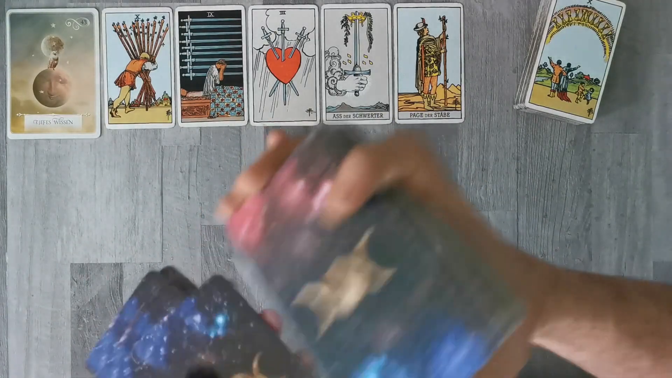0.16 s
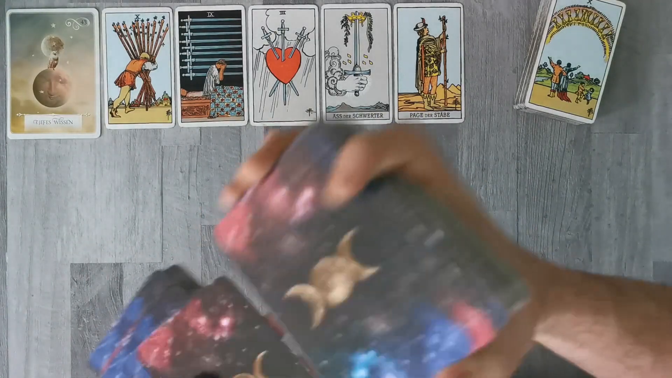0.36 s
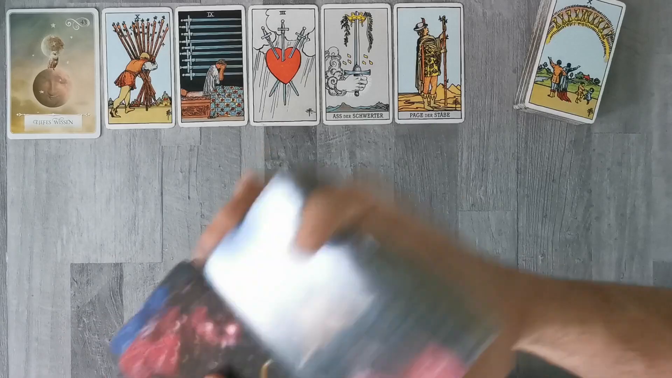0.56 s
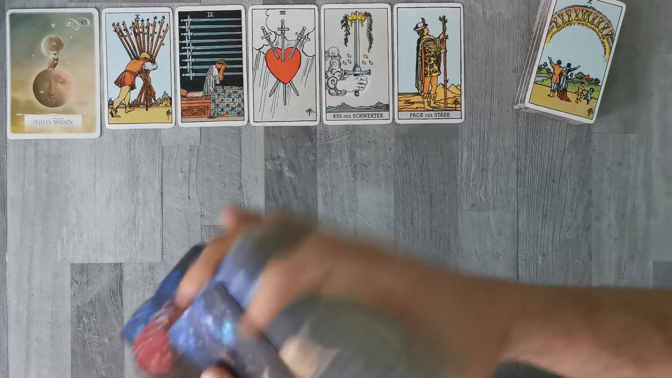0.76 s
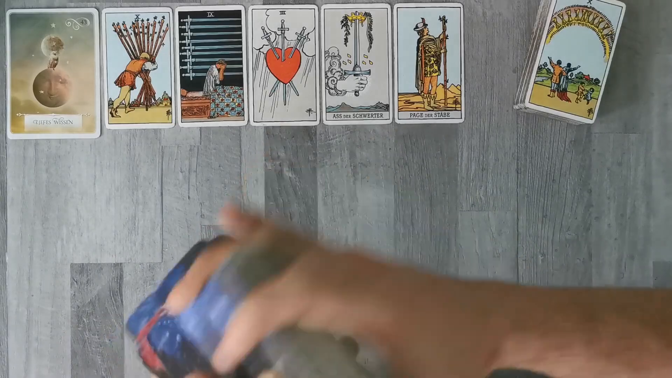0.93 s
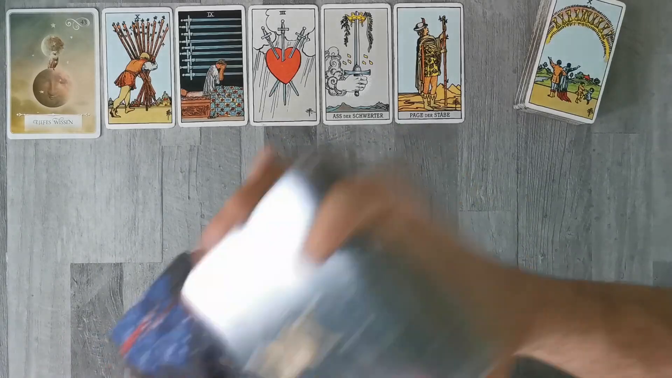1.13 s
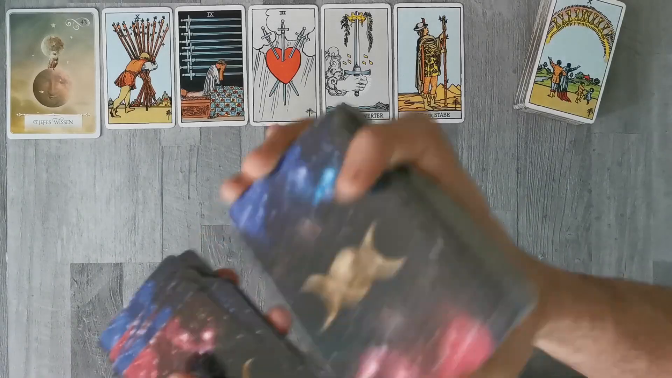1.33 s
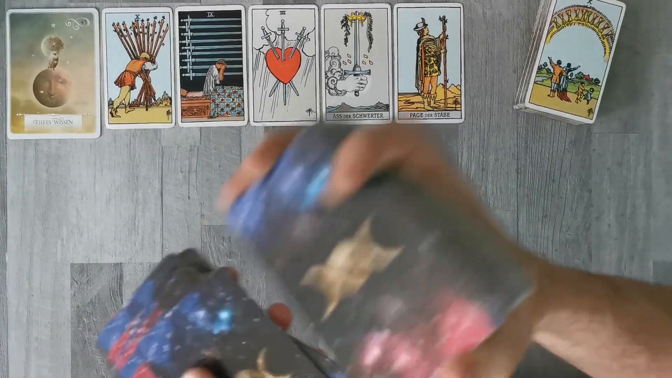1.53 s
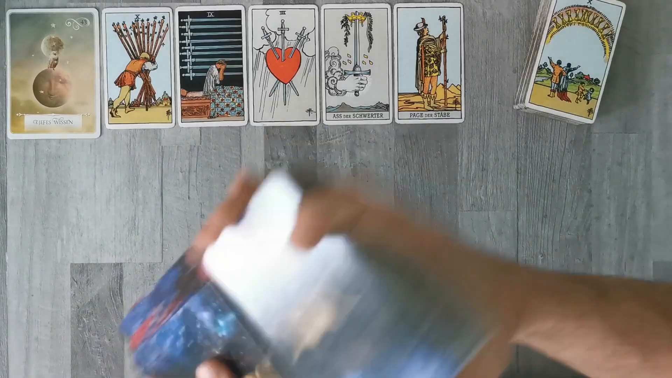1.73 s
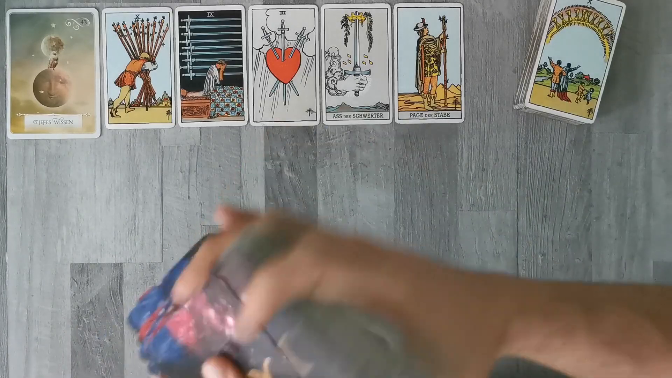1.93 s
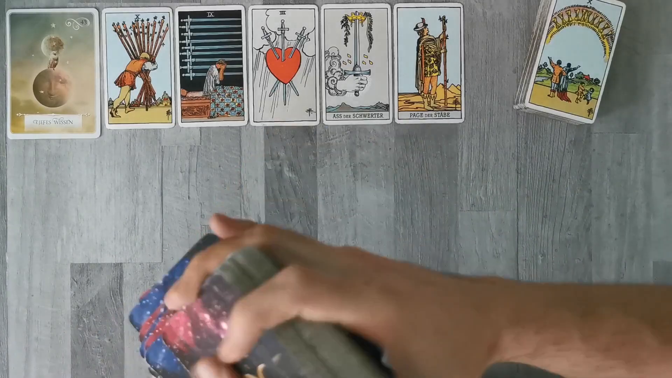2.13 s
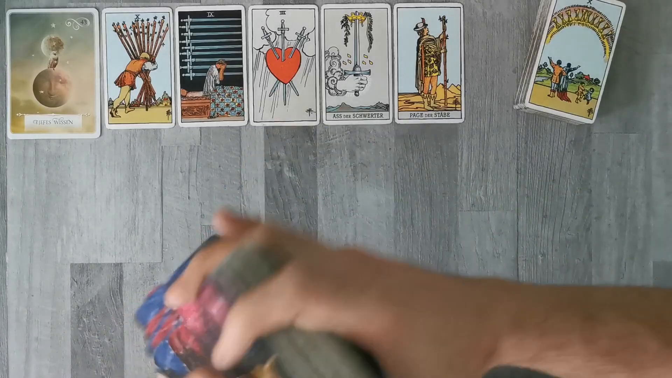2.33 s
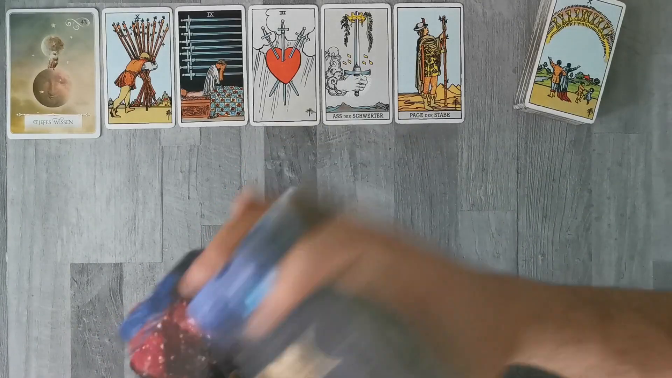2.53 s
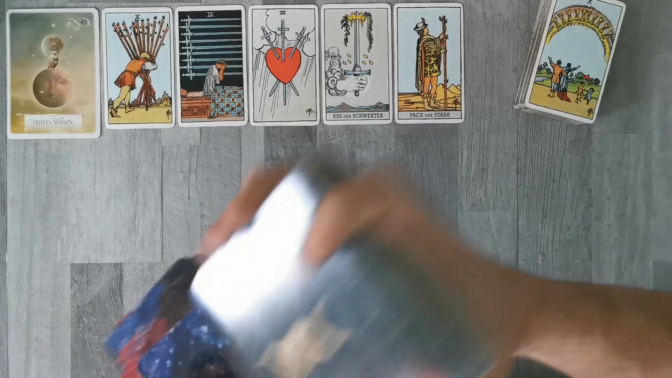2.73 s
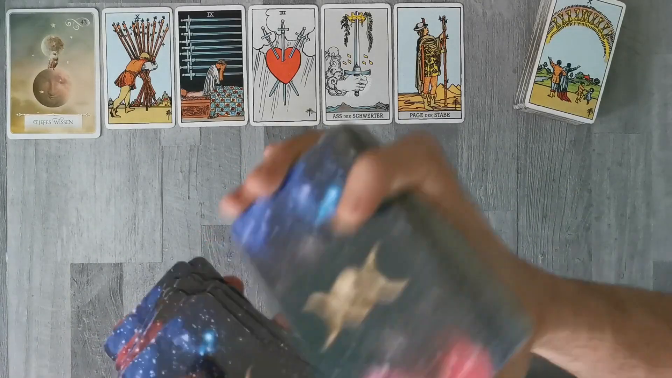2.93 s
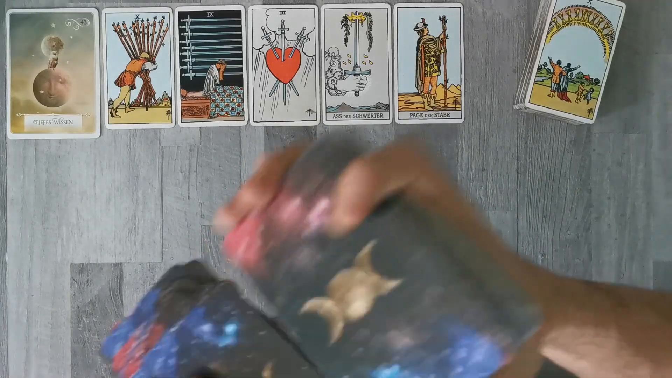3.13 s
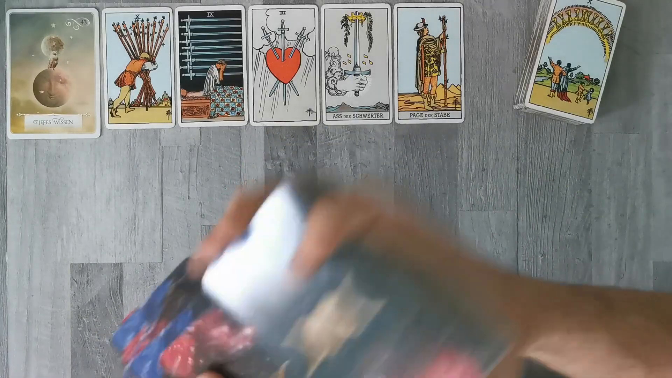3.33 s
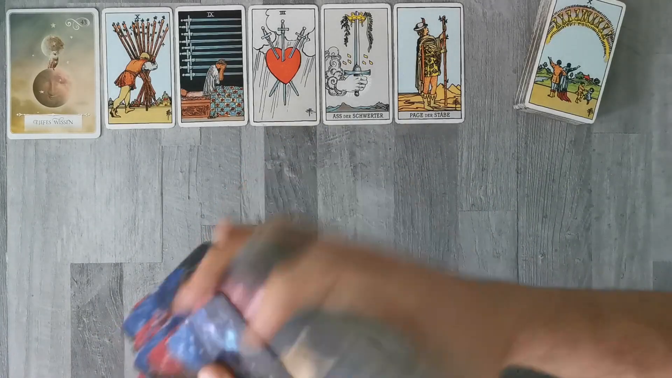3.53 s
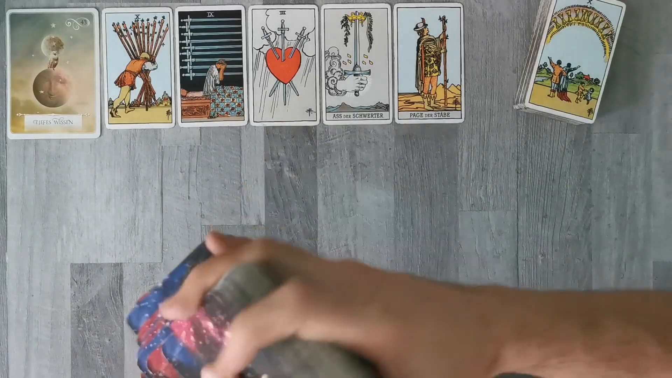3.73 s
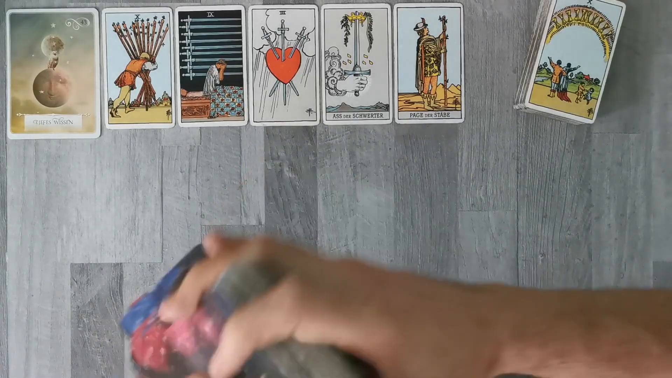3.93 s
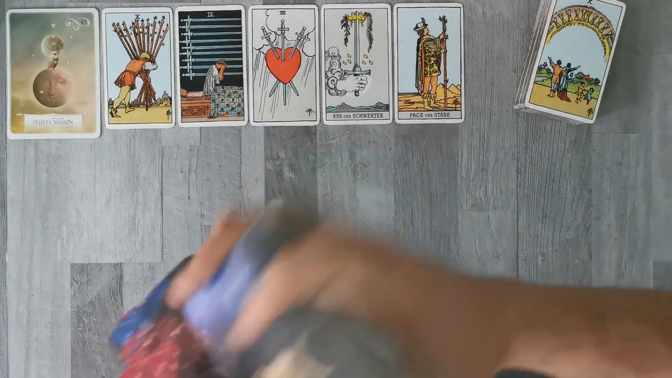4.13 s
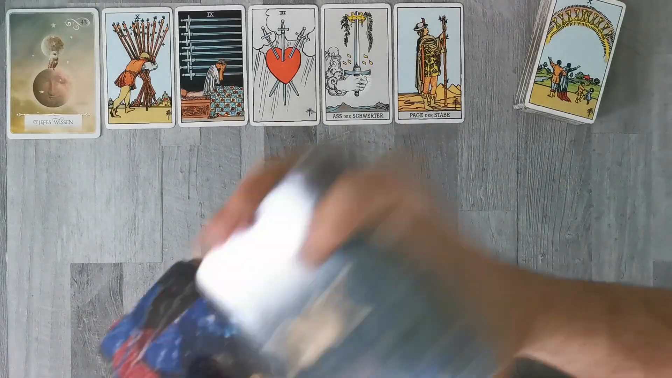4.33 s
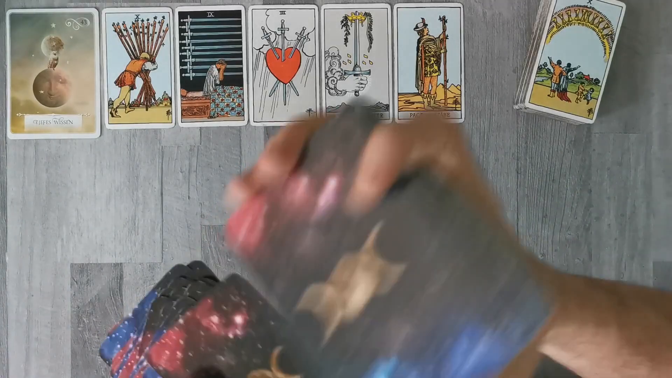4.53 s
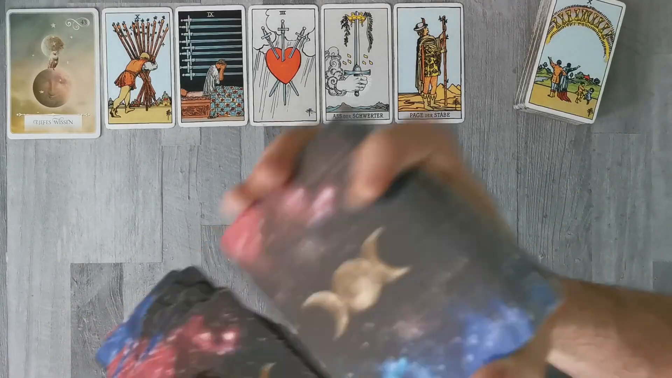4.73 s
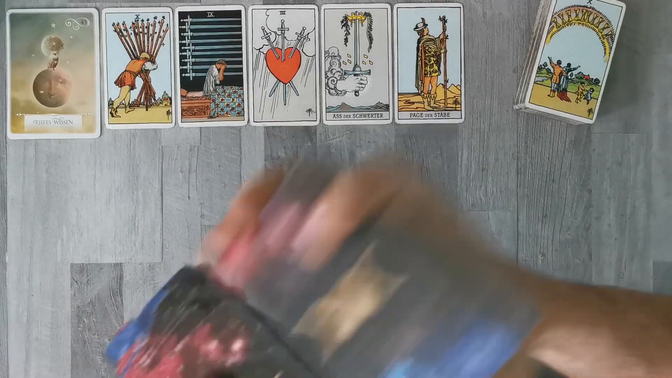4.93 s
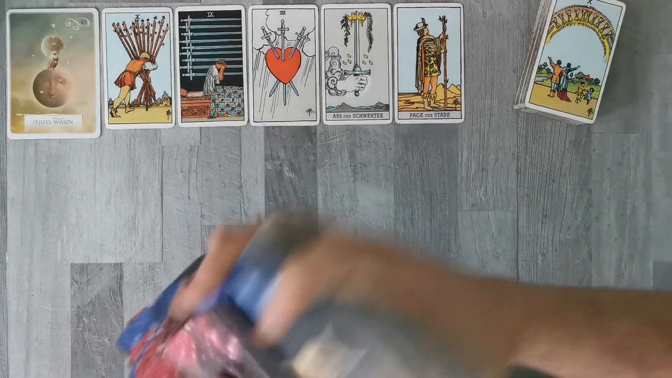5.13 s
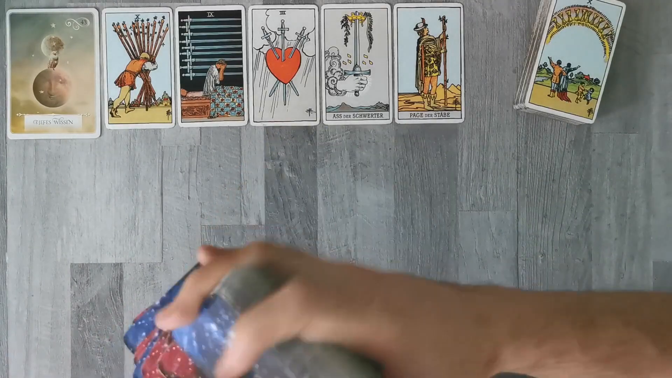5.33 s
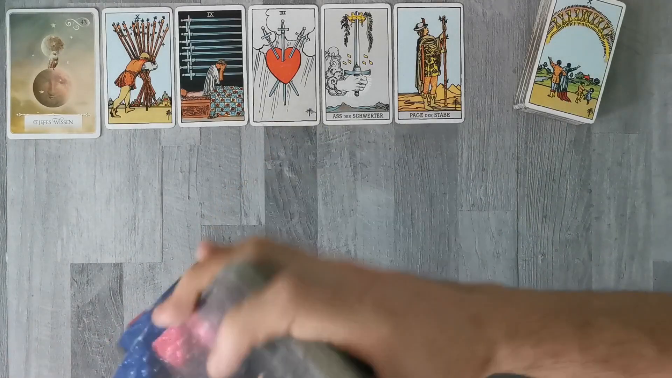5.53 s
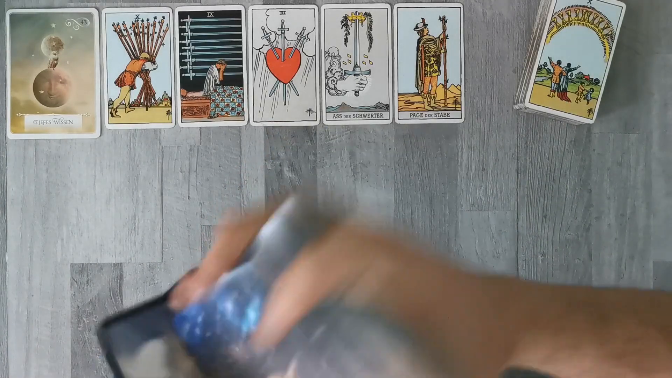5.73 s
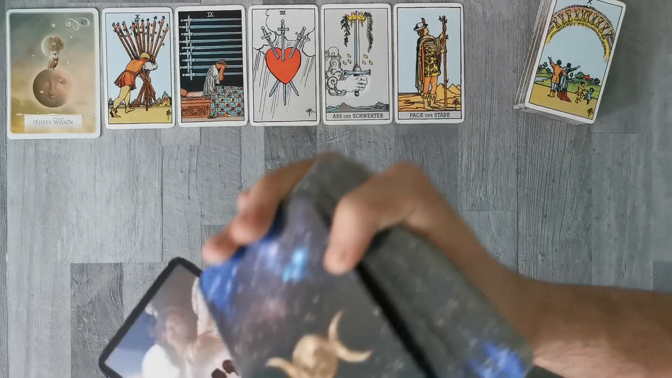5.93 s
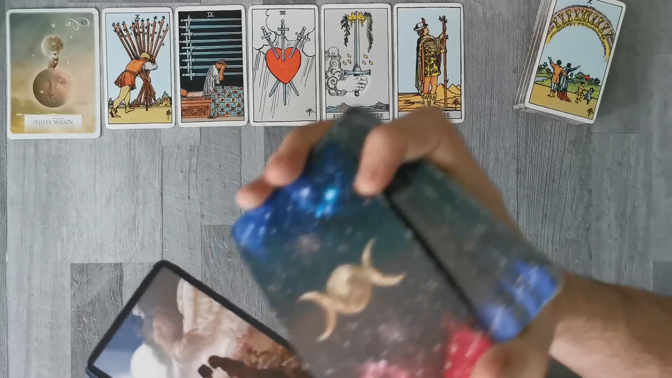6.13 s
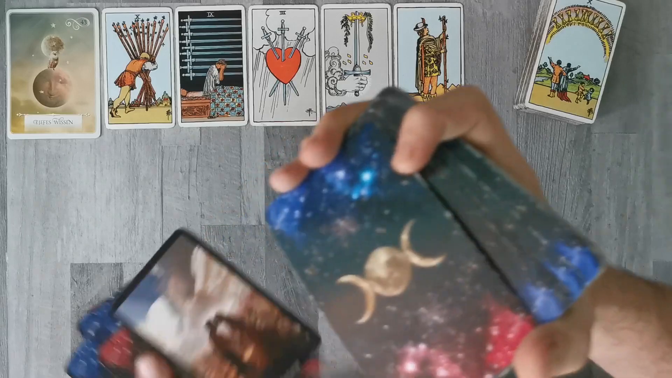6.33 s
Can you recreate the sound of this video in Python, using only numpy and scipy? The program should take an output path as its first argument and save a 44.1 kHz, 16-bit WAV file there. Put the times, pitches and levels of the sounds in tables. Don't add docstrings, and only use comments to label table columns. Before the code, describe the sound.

A steady card shuffle is already under way: dry slaps, brief sliding rustles, clicking card corners and dull low thumps from the hands, each slap slightly different. The rhythm stays even until about 5.5 seconds, then a squaring rustle, a firm tap and a double knock on the tabletop end it. Close stereo microphone, slightly left, quiet indoor room with low rumble and thin hiss.

```python
import sys
import numpy as np
from scipy import signal
from scipy.fft import rfft, irfft, next_fast_len
from scipy.io import wavfile

SR = 44100
rng = np.random.default_rng(int(sys.argv[2]) if len(sys.argv) > 2 else 0)


def to_linear_factor(level_db):
    exponent = np.asarray(level_db, float) / 20
    return 10 ** exponent


def dump(signal):
    limited = np.clip(np.atleast_2d(signal).T, -1, 1)
    pcm = np.round(limited * 32767).astype(np.int16)
    wavfile.write(sys.argv[1], SR, pcm)


N = 280917
SIZE = next_fast_len(N + 4096)
HZ = np.maximum(np.fft.rfftfreq(SIZE, 1 / SR), 1)
TIME = np.arange(N) / SR

# (time [s], hiss rms [dB], face rub [dB rel], rise [ms], contact [ms])
LANDINGS = [(0.226, -24, -8, 9, 18.6), (0.47, -29, -1, 12.4, 14), (0.691, -27.5, 0.5, 6.8, 16.4),
            (0.923, -26.5, -2.5, 11.3, 14.6), (1.17, -24.5, -8.5, 6.4, 17.6), (1.398, -21.5, -3.5, 14, 9.6),
            (1.64, -28, -5.5, 9.7, 7.2), (1.872, -27.5, -4, 7.9, 9.7), (2.107, -27, -7.5, 9.5, 14),
            (2.32, -24, -14.5, 4.3, 16), (2.561, -28, -4.5, 3.5, 11), (2.794, -26.5, -3.5, 9.5, 13.4),
            (3.005, -28, 2.5, 13, 6.4), (3.231, -26.5, -15.5, 0.71, 11), (3.457, -24, -6.5, 4.2, 13.4),
            (3.694, -20.5, -17.5, 3.5, 11.2), (3.926, -24, -9, 8, 12), (4.1406, -25, -4.5, 6.3, 17.5),
            (4.378, -22.5, -18, 9, 11.4), (4.599, -25.5, -10.5, 6.9, 10), (4.827, -23, -9.5, 7, 18.5),
            (5.05, -21.5, -7.5, 6.3, 5.9), (5.281, -22.5, -10.5, 4.6, 15.6), (5.5186, -28, -12, 7.7, 13.4)]
# (edge sheen [dB rel], finest hiss [dB rel], slide home [dB rel])
LANDING_COLOURS = [(-7.5, 0.5, 4), (-1.5, 2, -9), (-3, -1, -6), (-2.5, 0.1, -5), (0, -1, 2), (-9, 3, -14),
                   (4, 2.3, -1.5), (1, -1, 9.5), (0.5, 4, 10), (-3.5, -1.2, 3.5), (-0.5, 1, 8.5),
                   (-1, 2.5, -4), (-1.5, 2.5, 0), (1, -2, 6), (-7, -0.5, 1.5), (0, 2.5, 0.5), (-7, 4.5, 0),
                   (-3.5, -1.5, 5), (-4, -2.5, -2), (-3.5, -2.5, 4.5), (-7, 0, 3.5), (-8, 1, -4),
                   (-11, -1.5, -2), (1.5, -2, 6), (-20, -1.7, 0.1), (-7, 0, 0.1), (-10.5, -5.5, 0.1)]
# (time [s], hiss peak [dB], air [dB rel], body [dB rel], mid [dB rel], contact [ms])
TABLE_DROP = [
    (5.876, -32.5, -11.5, 5, 9, 2.4),
    (5.8848, -20, -9, -9, 3.5, 2.4),
    (5.899, -16.5, -12, -14.5, 4.5, 0.79),
]
SPLIT_HZ = (1200, 4000, 9500)


def rms_one(x):
    return x / np.sqrt(np.mean(x ** 2) + 1e-20)


def at_hz(points, hz):
    p = np.array(points, float)
    return np.interp(np.log(hz), np.log(np.maximum(p[:, 0], 1)), p[:, 1])


def through(x, response):
    return irfft(rfft(x, SIZE) * response, SIZE)[..., :N]


def band(x, low_hz, high_hz):
    return signal.sosfilt(signal.butter(2, [low_hz, high_hz], "band", fs=SR, output="sos"), x)


def resonate(x, hz, width_hz):
    r = np.exp(-np.pi * width_hz / SR)
    poles = [1, -2 * r * np.cos(2 * np.pi * hz / SR), r * r]
    return signal.lfilter(np.array([1, 0, -1]) * (1 - r * r) / 2, poles, x)


def strikes(rows):
    clicks, rows = np.full(N, 1e-18), np.array(rows)
    clicks[(rows[:, 0] * SR).astype(int)] = to_linear_factor(rows[:, 1])
    return clicks


def ring(clicks, modes):
    out = 0
    for hz, db, t60 in modes:
        r, w = to_linear_factor(-60 / (t60 * SR)), 2 * np.pi * hz / SR
        out = out + to_linear_factor(db) * signal.lfilter([0, np.sin(w)], [1, -2 * r * np.cos(w), r * r], clicks)
    return out


def diffuse(mid_side):
    # (frequency [Hz], likeness [0-1])
    likeness = [(30, 0.8), (100, 0.85), (300, 0.9), (1000, 0), (3000, 0), (8000, 0.9), (15000, 0.2)]
    alike = np.clip(at_hz(likeness, HZ), 0, .99)
    mid, side = through(mid_side, np.sqrt([(1 + alike) / 2, (1 - alike) / 2]))
    return np.array([mid + side, mid - side])


def quiet_room():
    # (frequency [Hz], density [dB per Hz])
    floor_colour = [(12, -43), (20, -3.5), (52, -10), (66, -16.5), (76, -18), (123, -9), (153, -19.5),
                    (197, -10), (220, -35), (407, -23), (481, -21), (888, -28), (15700, -51)]
    # (frequency [Hz], width [Hz], rms [dB])
    hum_lines = [(44, 5.3, -61), (119.7, 10, -59.5), (193.3, 9.2, -61), (288, 29, -64.5)]
    floor = to_linear_factor(-53.5) * rms_one(through(rng.standard_normal((2, N)), to_linear_factor(at_hz(floor_colour, HZ))))
    white = rng.standard_normal((2, N))
    hum = sum(to_linear_factor(db) * rms_one(resonate(resonate(white, hz, w), hz, w)) for hz, w, db in hum_lines)
    hiss = to_linear_factor(-77.0) * white + to_linear_factor(-75) * band(white, 11200, 18000)
    return diffuse(floor + hum + hiss)


def room(x, level_db, gap_s):
    # (frequency [Hz], decay by 60 dB [s])
    decay = [(100, 0.017), (400, 0.3), (1000, 0.24), (2200, 0.35), (3300, 0.24), (6000, 0.31), (9000, 0.24),
             (15000, 0.2)]
    white, tail, step = rng.standard_normal((2, 2, N)), 0, np.sqrt(2)
    fill = np.exp(-1 / (gap_s * SR))
    for k, low in enumerate(70 * step ** np.arange(16)):
        keep = to_linear_factor(-120 / (at_hz(decay, low * step ** .5) * SR))
        poles = np.convolve([1, -keep], [1, -fill])
        energy = signal.lfilter([(1 - keep) * (1 - fill)], poles, band(x, low, low * step) ** 2)
        tail = tail + np.sqrt(np.maximum(energy, 0)) * rms_one(band(white[k % 2], low, low * step))
    tail = tail + to_linear_factor(1.0) * resonate(tail, 596, 70)
    return to_linear_factor(level_db) * diffuse(tail)


def table_echoes(x, level_db, fade_ms):
    ms = np.arange(1, SR // 20) / SR * 1000
    echoes = rng.standard_normal((2, len(ms))) ** 3 * np.exp(-ms / fade_ms) * (ms > .8)
    echoes /= np.sqrt(np.sum(echoes ** 2, axis=1, keepdims=True))
    return to_linear_factor(level_db) * through(x, rfft(echoes, SIZE))


def arm_thuds():
    # (time [s], peak [dB])
    soft_blows = [(0.009, -32), (0.152, -39.5), (0.257, -31.5), (0.385, -41.5), (0.502, -33.5),
                  (0.625, -43), (0.703, -28), (0.859, -38.5), (0.966, -40), (1.088, -31.5), (1.207, -35),
                  (1.344, -39), (1.416, -32), (1.561, -38), (1.649, -34.5), (1.772, -27), (1.88, -33.5),
                  (2.026, -42), (2.141, -39.5), (2.353, -32), (2.482, -36), (2.71, -37.5), (2.814, -38),
                  (2.951, -31), (3.022, -28.5), (3.266, -43), (3.387, -40.5), (3.466, -31), (3.492, -29.5),
                  (3.618, -42), (3.728, -32), (3.937, -32.5), (4.15, -24.5), (4.173, -40), (4.3, -40),
                  (4.376, -42), (4.62, -39), (4.843, -35.5), (5.078, -27), (5.295, -31), (5.529, -29),
                  (5.695, -39.5), (5.765, -30), (5.879, -24), (5.916, -38)]
    # (frequency [Hz], level [dB], decay by 60 dB [s])
    low_modes = [(86, -13, 0.035), (137, 2.5, 0.044), (173, -8.5, 0.01)]
    return band(ring(strikes(soft_blows), low_modes), 72, 170)


def fingertips():
    # (time [s], peak [dB])
    taps = [
        (1.7735, -20),
        (1.781, -21),
        (1.7, -23),
        (3.4985, -14),
        (2.7247, -17),
        (2.713, -28.5),
        (5.809, 0.5),
    ]
    # (time [s], peak [dB])
    palm_pats = [(0.156, -37.5), (0.259, -34.5), (0.388, -35), (0.628, -46), (0.704, -34), (0.86, -38.5),
                 (1.089, -35), (1.419, -33), (1.774, -33.5), (2.028, -48), (2.142, -52), (2.485, -41),
                 (2.715, -45.5), (3.393, -40), (4.155, -40.5), (4.307, -43.5), (5.009, -44), (5.061, -33),
                 (5.286, -35), (5.882, -25.5)]
    # (frequency [Hz], level [dB], decay by 60 dB [s])
    palm_modes = [(280, 0, 0.075), (345, -7, 0.027)]
    flicks = to_linear_factor(13.5) * band(strikes(taps), 120, 2700)
    return flicks + to_linear_factor(0.5) * band(ring(strikes(palm_pats), palm_modes), 150, 600)


def table_knock():
    # (frequency [Hz], level [dB], decay by 60 dB [s])
    top_modes = [(1310, -5, 0.015), (1660, 2, 0.04), (1793, -9.5, 0.17), (2350, -23.5, 0.1)]
    return to_linear_factor(6.5) * ring(strikes(TABLE_DROP[1:]), top_modes)


def pings():
    # (time [s], peak [dB], pitch [Hz])
    corners = [(0.167, -32, 2630), (0.6393, -28, 2460), (0.7048, -23, 2430), (0.9133, -31.5, 2530),
               (0.9301, -18, 1100), (1.134, -25, 2690), (1.1907, -21, 2720), (1.2112, -25, 1440),
               (1.3394, -19, 2220), (1.3549, -15, 1690), (1.4097, -25.5, 2380), (1.9055, -17, 2960),
               (2.147, -29, 1550), (2.3376, -26, 2170), (2.576, -23, 2360), (2.7228, -20.5, 2440),
               (2.8125, -18.5, 2140), (2.9506, -20, 2230), (2.9564, -26, 2100), (3.0014, -22, 1240),
               (3.0142, -24, 2470), (3.2382, -32, 1100), (3.465, -16, 2300), (3.4983, -22.5, 1420),
               (3.8657, -20, 1650), (3.8896, -22, 1250), (3.9382, -19, 2230), (4.145, -23, 1240),
               (4.1588, -19, 1190), (4.3791, -28.5, 1150), (4.6064, -20, 2060), (4.8272, -28, 2010),
               (4.8447, -15, 2550), (5.0641, -21, 2320), (5.2917, -23, 1130), (5.3223, -26, 2500),
               (5.5238, -23, 1140), (5.695, -26, 1420), (5.7912, -30, 2200), (5.8854, -7, 1147),
               (5.8981, -7, 1660), (6.0095, -30.5, 2220)]
    cycles, partner_ratio = 31, .58
    out, t = np.zeros(N), np.arange(SR // 20) / SR
    for s, db, hz in corners:
        partner_hz = hz * partner_ratio if hz > 1900 else hz / partner_ratio
        modes = np.array([[hz], [partner_hz]])
        rung = np.sin(2 * np.pi * modes * t) * to_linear_factor(-60 * t * hz / cycles) * to_linear_factor([[0], [-6.5]])
        at = int((s + .0007) * SR)
        out[at:at + len(t)] += to_linear_factor(db - 3) * rung.sum(axis=0)
    return out


def grit(spread_db, lump_db, lump_hz):
    lumps = np.clip(rms_one(band(rng.standard_normal(N), lump_hz / 6, lump_hz)), -2, 2)
    size = to_linear_factor(spread_db * np.minimum(rng.exponential(1, N), 3) + lump_db * lumps)
    return rms_one(size * rng.standard_normal(N))


def catches(per_s, level_db):
    size = to_linear_factor(level_db + 2.98 * np.minimum(rng.exponential(1, N), 2.5))
    return size * (rng.random(N) < per_s / SR) * rng.choice([-1, 1], N)


def stroke(s, rise_ms, hold_ms, fade_ms, slide_db=-19, slide_ms=14, arch_db=4):
    part = slice(max(int((s - .1) * SR), 0), int((s + .2) * SR))
    ms = (TIME[part] - s) * 1000
    before = np.minimum(ms, 0)
    rise = np.maximum(np.exp(before / rise_ms), to_linear_factor(slide_db) * np.exp(before / slide_ms))
    arch = to_linear_factor(1.5 - arch_db * np.clip(2 * ms / hold_ms - 1, -1, 1) ** 2)
    return part, rise * arch * np.exp(-np.maximum(ms - hold_ms, 0) / fade_ms)


def gliding():
    # (time [s], level [dB])
    rubbing = [(0.0, -29), (0.14, -64), (1.2, -52.5), (1.55, -57), (1.78, -52), (2.0, -69), (2.65, -55.5),
               (3.05, -74), (3.4, -51.5), (4.2, -60), (4.4, -52), (4.9, -91), (5.68, -50), (5.775, -34),
               (5.86, -51), (6.04, -40), (6.08, -87), (6.2, -82)]
    s, db = np.transpose(rubbing)
    busy, slide = to_linear_factor(np.interp(TIME, s, db)), np.zeros(N)
    for (s, db, *_), (*_, home_db) in zip(LANDINGS, LANDING_COLOURS):
        part, shape = stroke(s + 0.035, 30, 5.3, fade_ms=13)
        slide[part] += to_linear_factor(db - 7.5 + home_db) * shape
    return to_linear_factor([[-8], [-9], [-7], [-13.5]]) * (busy + slide * to_linear_factor([[-15.5], [1], [0], [0.3]]))


def lifts():
    # (time [s], hiss peak [dB], body [dB rel], face [dB rel])
    pickups = [(0.1594, -37.5, -14, -15), (0.169, -39.5, -26, 2.5), (0.389, -35, -4.5, -6),
               (0.6382, -33.5, -6, -4), (0.859, -55, 4, -17), (0.897, -40, -18, -32),
               (1.092, -39, 1.5, -0.5), (1.133, -29.5, -9, -7.5), (1.338, -24, -23, -2),
               (1.575, -39, -16, -12.5), (1.7696, -59, 24, -8), (1.8372, -35, -5.5, -8),
               (2.031, -44, -43, -12), (2.261, -49, -2, 5), (2.4873, -45, 2, -11), (2.7272, -35, -15, 7.5),
               (2.955, -36.5, -15, -2), (3.39, -46, 3, -9), (3.641, -41, 0, -8.5), (3.666, -31, -19, -46),
               (3.865, -46.5, 7, 10.5), (3.8877, -40.5, 2, 9), (4.0982, -45, 8, -5.5),
               (4.305, -46.5, 2.5, -2), (4.984, -52.5, 8, 7), (5.007, -40.5, 6.5, -0.5),
               (5.242, -50.5, 6.5, -27.5), (5.45, -42, -5, -12), (5.671, -45.5, -7, 12.5),
               (5.694, -33, -22, -10)]
    air_db, contact_ms = -7, 4.7
    rows = [(s, db, air_db, *rel, contact_ms) for s, db, *rel in pickups]
    out = np.zeros((4, N))
    for s, db, air_db, body_db, mid_db, hold_ms in rows + TABLE_DROP:
        fade_ms = 4 if db > -18 else 5
        part, shape = stroke(s, 0.21, hold_ms, fade_ms, slide_db=-23.5)
        out[:, part] += to_linear_factor(db + np.array([[body_db - 0.5], [mid_db], [-7], [air_db + 0.5]])) * shape
    return out


def pile(rough):
    # (time [s], rms [dB], pitch [Hz], contact [ms])
    knocks = [(0.002, -23, 392, 2.6), (0.225, -24, 795, 5.3), (0.461, -41, 354, 15),
              (0.691, -29.5, 267, 15), (0.927, -23.5, 990, 12.4), (1.186, -39.5, 366, 3.6),
              (1.419, -28.5, 300, 2), (1.638, -32, 606, 22), (1.871, -31, 330, 6.5),
              (2.125, -53.5, 800.0, 12), (2.318, -38, 1110, 17), (2.578, -42.5, 860, 16),
              (2.808, -43.5, 770, 5.3), (3.001, -33.5, 610.0, 2.8), (3.236, -26, 560, 7.3),
              (3.461, -25.5, 630, 5.7), (3.694, -39.5, 616, 29), (3.919, -37, 340, 19),
              (4.143, -29.5, 810, 12), (4.376, -27.5, 770, 6.4), (4.599, -32, 800, 6.3),
              (4.839, -53.5, 330.0, 50), (5.048, -31.5, 405, 5.4), (3.73, -39, 600, 3),
              (0.263, -37, 590, 4), (3.497, -32.5, 580, 6.4), (2.591, -41, 720, 2.1),
              (5.283, -29.5, 292, 11), (5.524, -25, 985, 6.3), (5.771, -28.5, 363, 15),
              (5.81, -28, 736, 1.0), (5.886, -20, 800.0, 0.91)]
    out = np.zeros(N)
    for s, db, hz, hold_ms in knocks:
        part, shape = stroke(s, 3.5, hold_ms, fade_ms=9.3, slide_db=-20.0)
        drive = shape * rough[part]
        drive[int(s * SR) - part.start] += to_linear_factor(17.5)
        tone = resonate(drive, hz, .09 * hz) / np.sqrt(.2 * hz)
        tone += band(drive, 450, 1300) / np.sqrt(1000.)
        tone += to_linear_factor(-22.5) * resonate(drive, 345, 54)
        out[part] += to_linear_factor(db + 39.0) * tone
    return out


def snaps():
    # (time [s], hiss peak [dB], body [dB rel])
    ticks = [(0.2633, -29.5, -6.5), (0.5082, -13, -34.5), (0.6296, -51, 0), (0.7236, -8, -30),
             (0.9332, -15, -45), (1.212, -19, -24), (1.357, -28, -8.5), (1.7809, -52, 17),
             (1.9053, -11.5, -33), (2.049, -52, -6), (2.128, -24, -20), (2.1484, -17.5, -18.5),
             (2.3529, -29, -8), (2.9513, -15, -22), (3.0053, -12.5, -20.5), (3.177, -52.5, -3),
             (3.2735, -21.5, -17), (3.478, -27, -15), (3.4976, -23, -12.5), (4.178, -10, -23),
             (4.421, -14, -26.5), (4.556, -50, -12.5), (4.6453, -8, -36), (4.783, -36, -23),
             (4.847, -28, -11), (4.865, -24, -18), (5.0648, -9, -21.5), (5.0822, -23, -9),
             (5.2913, -10.5, -21.5), (5.3221, -8, -28.5)]
    # (time [s], peak [dB], body [dB rel], splinter [ms])
    claps = [(0.0084, -10.5, -17.5, 0.62), (0.2305, -14.5, -24, 0.5), (0.266, -15, -39, 0.5),
             (0.4724, -18, -39, 0.5), (0.6937, -18, -11, 0.5), (0.7064, -15, -19.5, 0.5),
             (0.875, -37, -29, 0.5), (1.1343, -29.5, -27.5, 0.5), (1.178, -26, -32, 0.55),
             (1.1933, -14.5, -24.5, 0.5), (1.3388, -16, -29.5, 0.5), (1.409, -11, -19, 0.5),
             (1.6431, -13, -19.5, 0.5), (1.8737, -8.5, -24, 0.5), (2.1088, -32, -37, 0.5),
             (2.2593, -31, -23, 0.5), (2.3208, -9.5, -21, 0.74), (2.5054, -28, -16, 0.5),
             (2.5654, -16, -27, 0.5), (2.576, -17, -23, 0.45), (2.7243, -8.5, -25, 0.5),
             (2.8146, -13.5, -23, 0.5), (3.0144, -19, -28, 0.5), (3.0282, -13, -28, 0.5),
             (3.24, 3, -33, 0.39), (3.465, -19.5, -26, 0.5), (3.696, -8, -29.5, 0.33),
             (3.7324, -19, -22, 0.56), (3.9298, -8.5, -25.5, 0.54), (4.082, -39, -20, 0.5),
             (4.0986, -30, -26.5, 0.5), (4.1484, -13.5, -24, 0.55), (4.1577, -12.5, -23, 0.5),
             (4.1801, -14, -15, 0.39), (4.379, -15, -25, 0.5), (4.606, -13, -27, 0.91),
             (4.836, -25, -27, 0.5), (4.9836, -33, -25, 0.5), (5.054, -10, -26, 0.5),
             (5.242, -31, -20, 0.5), (5.45, -42, -25, 0.5), (5.4724, -38, -23, 0.5),
             (5.5275, -19.5, -37, 0.45), (5.695, -29, -31, 0.45), (6.1187, -46, -13, 0.5)]
    # (time [s], hiss peak [dB], body [dB rel], air [dB rel], face [dB rel])
    settling = [
        (5.671, -33.5, -6, -9, -6.5),
        (5.7924, -19.5, -18, -13, -3),
        (5.8075, -11.5, -15.5, -4, -7),
        (5.8864, -28, -15, -8.5, 6),
        (5.8996, -4, -26, -11, -32),
        (6.0106, -27.5, -25, -3, 5),
        (6.1097, -51, -19.5, -13, 7),
        (6.1884, -58.5, 2, -15, 7),
        (6.216, -61, -3, -24.5, 2),
    ]
    short = [(s, db, body_db, 0.17) for s, db, body_db in ticks]
    short += [(s, db - 5, *rest) for s, db, *rest in claps]
    rows = [(s, db, body_db, -5, 0.61 * body_db, ms) for s, db, body_db, ms in short]
    rows += [(*row, .35) for row in settling]
    out = np.zeros((4, N))
    for s, db, body_db, air_db, mid_db, ms in rows:
        at = int(s * SR)
        crack = rng.standard_normal(132) * np.exp(-np.arange(132) / (ms * SR / 1000))
        crack[0] += 3
        crack *= 3 / np.sqrt(np.sum(crack ** 2))
        levels = [[db + body_db + 18.5], [db + mid_db + 12.5], [db - 1.5], [db + air_db + 4.5]]
        out[:, at:at + 132] += to_linear_factor(levels) * crack
    return out


def landings():
    # (time [s], hiss rms [dB], face rub [dB rel], rise [ms], contact [ms])
    squaring = [
        (0.0072, -30, -3, 8.6, 7.5),
        (5.771, -24.5, -4.5, 18.5, 4.1),
        (5.809, -13, -13.5, 0.56, 3),
    ]
    out = np.zeros((5, N))
    for (s, db, mid_db, rise_ms, hold_ms), (sheen_db, fine_db, _) in zip(LANDINGS + squaring, LANDING_COLOURS):
        air_db = 3 + 1.24 * (-23 - db) - 0.39 * mid_db + fine_db
        part, shape = stroke(s, rise_ms, hold_ms, fade_ms=0.66)
        out[2:, part] += to_linear_factor(db + np.array([[-4.5], [air_db - 8.5], [sheen_db - 2.5]])) * shape
        part, shape = stroke(s, 0.43 * rise_ms, 2.71 * hold_ms, fade_ms=19, slide_db=-2.0, slide_ms=28.4)
        out[1, part] += to_linear_factor(db + mid_db - 7.0) * shape
    return out


def pile_body(x):
    # (frequency [Hz], width [Hz], level [dB])
    deck_modes = [(330, 46, 9), (610, 46, 3.5), (800, 36, 10), (1028, 340, 0.5)]
    tones = sum((-1) ** k * to_linear_factor(db) * resonate(x, hz, w) for k, (hz, w, db) in enumerate(deck_modes))
    return tones + to_linear_factor(-7.0) * band(x, 380, SPLIT_HZ[0])


def card_face(x):
    # (frequency [Hz], width [Hz], level [dB])
    face_modes = [(1530, 940, -5), (2185, 250, 1)]
    return band(x, *SPLIT_HZ[:2]) + sum(to_linear_factor(db) * resonate(x, hz, w) for hz, w, db in face_modes)


def card_edges(x):
    return band(x, *SPLIT_HZ[1:])


def finest_hiss(x):
    return band(x, SPLIT_HZ[2], 22000)


def card_voice(excitations):
    unit = np.zeros(4096)
    unit[0] = 1
    parts = (pile_body, card_face, card_edges, finest_hiss)
    return sum(part(x + 1e-18) / np.sqrt(np.sum(part(unit) ** 2)) for part, x in zip(parts, excitations))


def shuffle():
    sheen_hz = (6760, 10040)
    coarse = grit(spread_db=-2.5, lump_db=5.5, lump_hz=245) + catches(per_s=120, level_db=3)
    fine = grit(spread_db=-2.0, lump_db=3.5, lump_hz=474)
    smooth = grit(spread_db=-3.5, lump_db=7.0, lump_hz=120)
    sheen = grit(spread_db=1.5, lump_db=5.0, lump_hz=300)
    slaps = landings()
    contacts = (slaps[:4] + lifts()) * [coarse, coarse, fine, fine]
    cards = card_voice(contacts + gliding() * smooth + snaps())
    edge_sheen = to_linear_factor(7.0) * band(slaps[4] * sheen, *sheen_hz)
    return cards + edge_sheen + pile(coarse)


def scene():
    # (frequency [Hz], lead [rad])
    port_phase = [(0, 0), (780, -0.0), (1290, 1.5), (1720, 0.2), (2240, 1.8), (3010, 1.8), (3360, 3.3),
                  (5170, 4.0), (5860, 6.2), (6290, 6.2), (7240, 6.3), (16500, 6.3)]
    # (time [s], left-right [dB], rumble [dB])
    hand_path = [
        (0, 2.5, -64),
        (1.5, 4.7, -58),
        (3.5, 4.7, -57),
        (5.7, 5, -51),
        (5.9, 0, -52),
        (6.37, -4, -57.5),
    ]
    hands = shuffle() + arm_thuds() + fingertips() + table_knock() + pings()
    p = np.array(port_phase)
    lead = np.exp(.5j * np.interp(HZ, p[:, 0], p[:, 1]))
    s, pan_db, rumble_db = np.transpose(hand_path)
    direct = through(hands, np.array([lead, 1 / lead])) * to_linear_factor(np.interp(TIME, s, pan_db) * [[.5], [-.5]])
    echoes = table_echoes(band(hands, 570, 21000), level_db=-3.5, fade_ms=4.7)
    near = direct + echoes + room(hands, level_db=-2.0, gap_s=0.004)
    shake = diffuse(rms_one(band(rng.standard_normal((2, N)), 22, 48)))
    return near + quiet_room() + to_linear_factor(np.interp(TIME, s, rumble_db)) * shake


def band_limit(x):
    return signal.sosfilt(signal.butter(12, 17000, fs=SR, output="sos"), x)


def record(dry):
    # (frequency [Hz], level [dB])
    left_port = [(100, 1.5), (380, -2), (700, -4.5), (1200, -6), (1900, -6.5), (2300, -3), (3700, -1),
                 (6300, -4.5), (7000, 4.5), (7600, -4.5), (8400, 2.5), (11300, 0.5), (13000, -7),
                 (15600, -6)]
    # (frequency [Hz], level [dB])
    right_port = [(100, -2), (700, 0), (1800, -2), (2400, 2), (3800, 0.5), (5000, 4), (6800, 0), (7800, 1),
                  (10000, 3), (10800, 10.5), (12000, 4.5), (13300, 7.5), (14000, -0.5), (15600, 2)]
    ports = through(dry, to_linear_factor([at_hz(left_port, HZ), at_hz(right_port, HZ)]))
    top = signal.cheby2(14, 42, 16100, fs=SR, output="sos")
    mix = np.clip(signal.sosfilt(top, ports) - 0.0008, -1, 1)
    return band_limit(mix)


dry = scene()
out = record(dry)
dump(out)
```